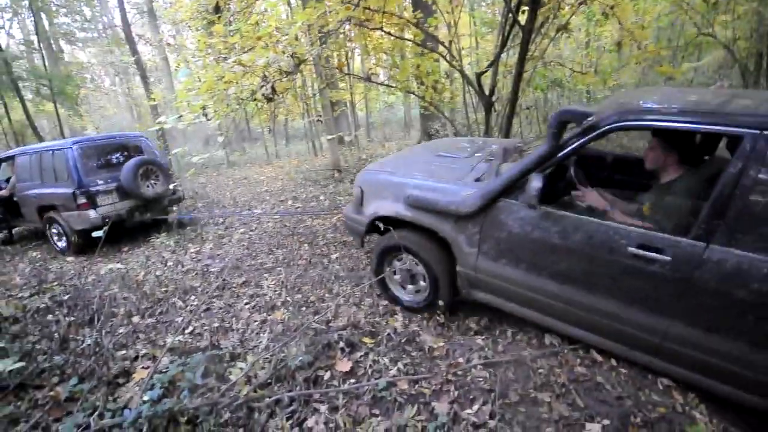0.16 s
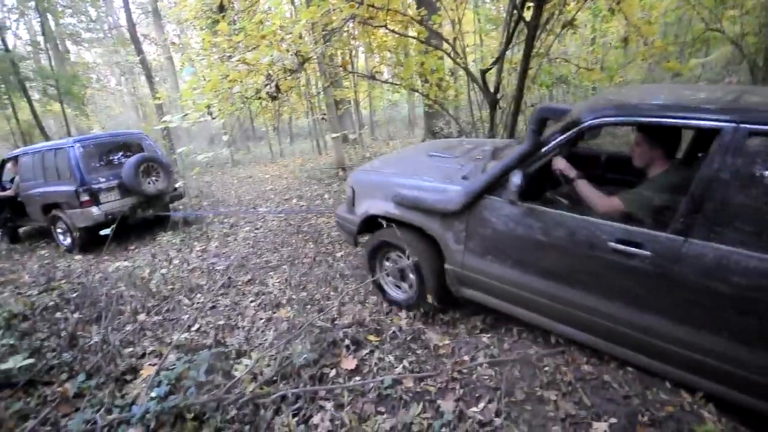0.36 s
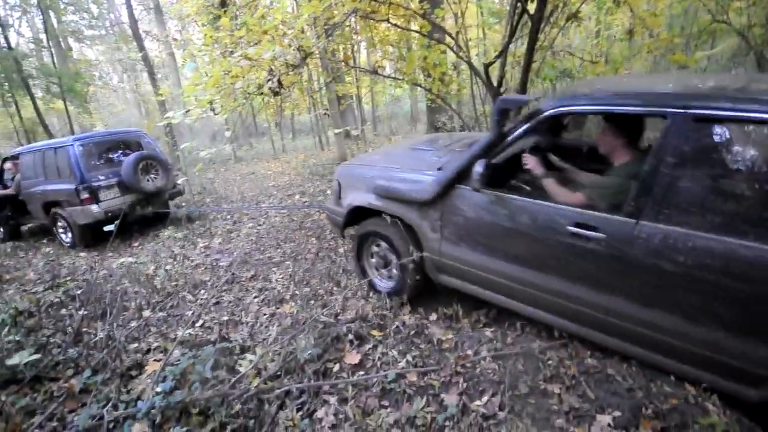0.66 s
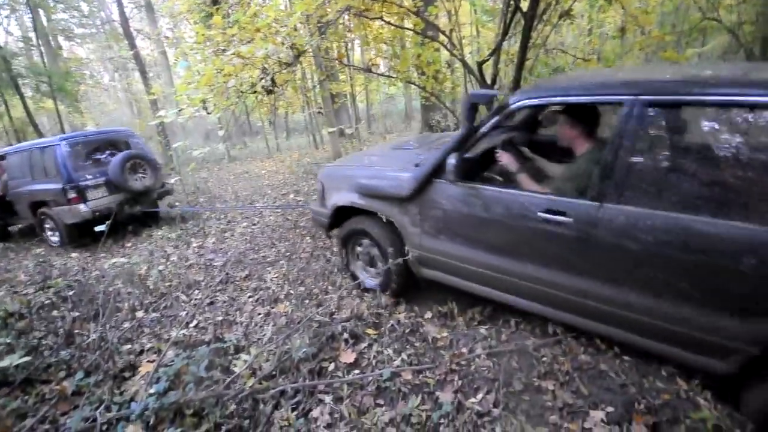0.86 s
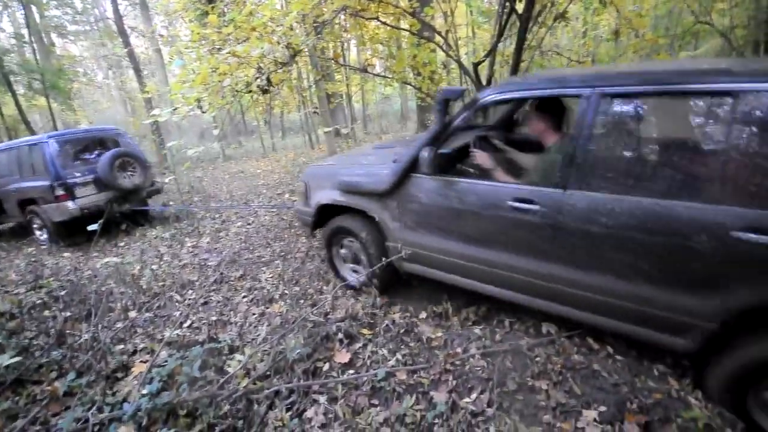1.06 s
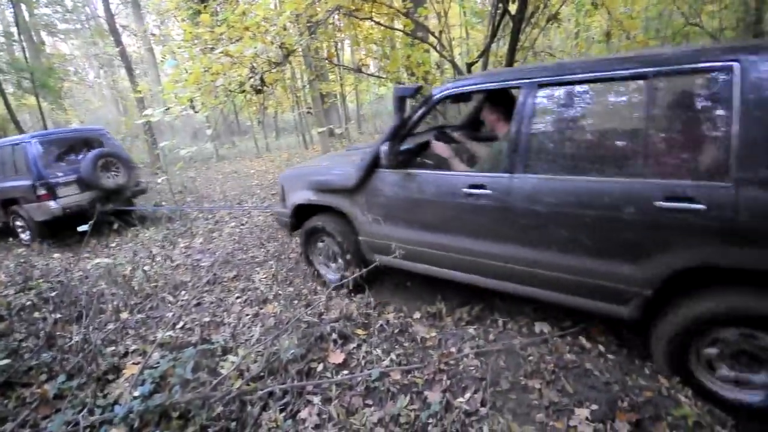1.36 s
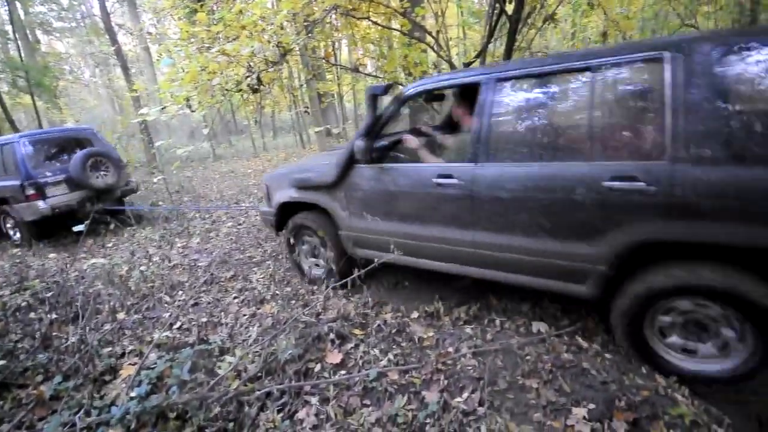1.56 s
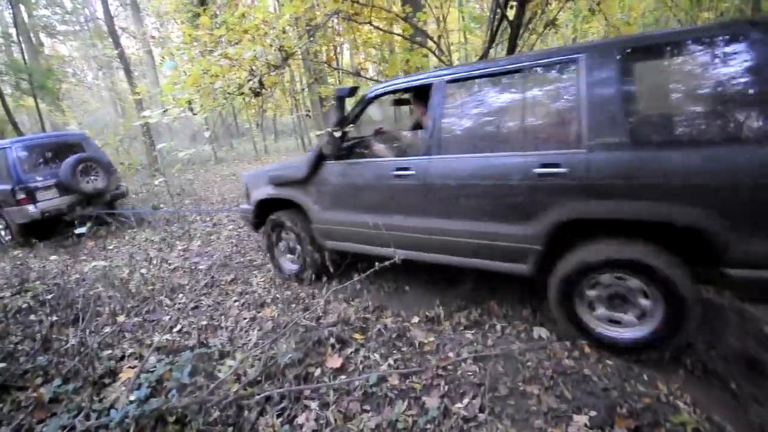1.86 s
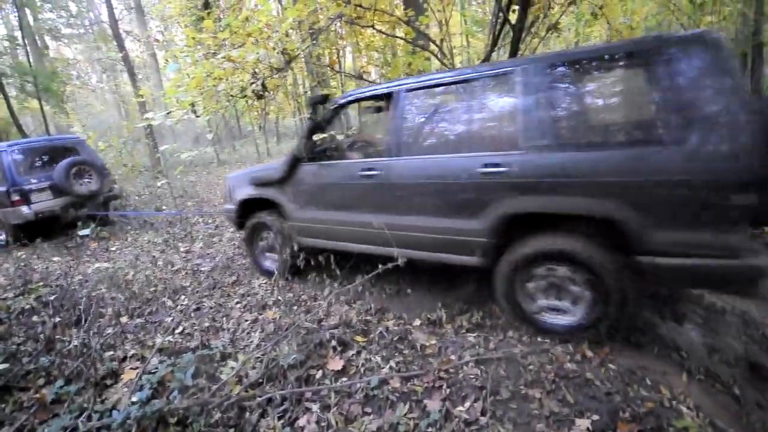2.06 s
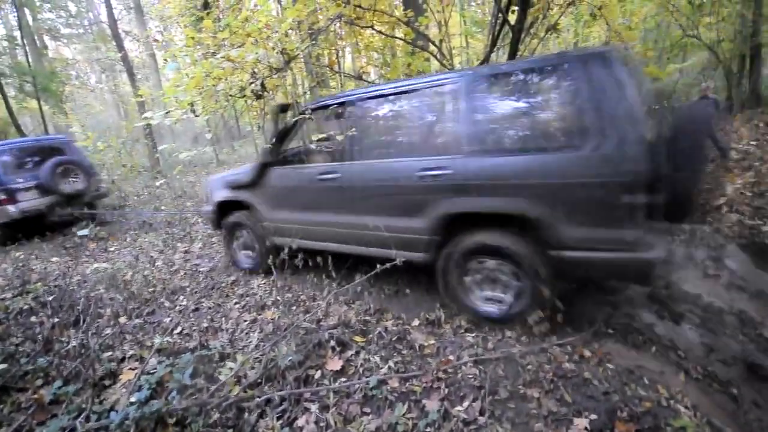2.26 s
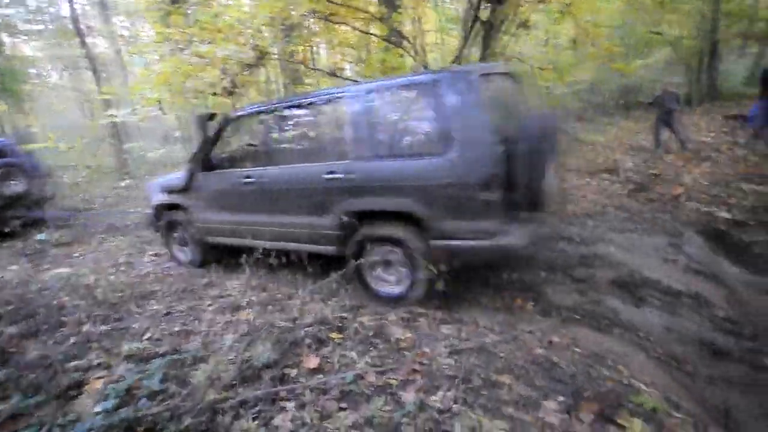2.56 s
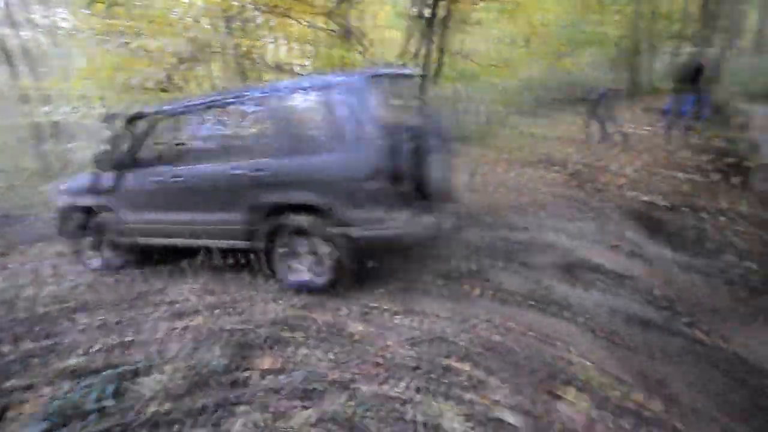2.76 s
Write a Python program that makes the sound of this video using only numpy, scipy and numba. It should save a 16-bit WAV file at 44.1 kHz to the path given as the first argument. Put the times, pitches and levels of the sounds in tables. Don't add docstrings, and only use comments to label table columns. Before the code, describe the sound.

A diesel four-wheel-drive passes close on a muddy forest track. Its knocking, booming growl climbs from 0 to about 1.1 s, with metallic rattle and hollow hoots, then sinks from 1.3 s. A gear whine sounds near 1.9-2.2 s as the throttle lifts; quieter low chugging rolls away. Leaves crackle, twigs snap, mud splashes, and a wheel thuds at 2.9 s. Dull, thin-bass microphone, faint tree echo.

```python
import sys
import numpy as np
from scipy import signal
from scipy.fft import rfft, irfft, next_fast_len
from scipy.io import wavfile
from scipy.ndimage import uniform_filter1d
from numba import njit

SR = 44100
rng = np.random.default_rng(int(sys.argv[2]) if len(sys.argv) > 2 else 0)


def level_to_linear(level):
    exponent = np.asarray(level, float) / 20
    return 10 ** exponent


def master_out(mix):
    frames = np.transpose(np.atleast_2d(mix))
    ceiling = np.clip(frames, -1, 1)
    pcm = np.round(ceiling * 32767).astype(np.int16)
    wavfile.write(sys.argv[1], SR, pcm)


N = 127890


def level(x, db):
    return x * level_to_linear(db) / np.sqrt(np.mean(x ** 2))


def curve(table, axis):
    return np.interp(np.arange(N) / SR, np.array(table)[:, 0], np.array(table)[:, axis])


def spectrum_db(table, hz):
    points = np.array(table)
    return np.interp(np.log(hz), np.log(points[:, 0]), points[:, 1])


def colour(x, table):
    size = next_fast_len(N + 4096)
    hz = np.arange(size // 2 + 1) * SR / size + 1
    return irfft(rfft(x, size) * level_to_linear(spectrum_db(table, hz)), size)[:N]


@njit
def svf(x, hz, width_hz):
    y, band, low = np.empty(len(x)), 0., 0.
    g, k = np.tan(np.pi * hz / SR), width_hz / hz
    for i in range(len(x)):
        v = (band + g * (x[i] - low)) / (1 + g * (g + k))
        band, low, y[i] = 2 * v - band, low + 2 * g * v, k * v
    return y


def ring(x, body):
    out = 0
    for k, (hz, width_hz, db) in enumerate(body):
        mode = svf(x, 1. * hz, 1. * width_hz) / np.sqrt(width_hz)
        out = out + (-1) ** k * level_to_linear(db) * mode
    return out


def walk(rate_hz):
    hold = int(SR / rate_hz)
    steps = np.repeat(rng.standard_normal(N // 50), hold)[:N]
    return 1.3 * uniform_filter1d(uniform_filter1d(steps, hold), hold)


def swell(middle_s, length_s):
    return np.cos(np.pi * np.clip((np.arange(N) / SR - middle_s) / length_s, -.5, .5)) ** 2


# start_s, level_db
WIND = [
    (0, 6),
    (.4, -4),
    (1.3, -8.5),
    (1.75, 3),
    (2.1, 1),
    (2.9, -2.5),
]


def rumble():
    ground = level(svf(rng.standard_normal(N), 35., 40.), -43)
    return ground * level_to_linear(3.7 * walk(4.7) + curve(WIND, axis=1))


# start_s, firing_hz, level_db
AHEAD = [
    (0, 71.23, -16),
    (.18, 72.9, -25),
    (.3, 73.7, -39),
    (2.9, 74.5, -52.5),
]
AHEAD_ORDERS_DB = [-13, -3.5, -3, -12, -13.5]


def ahead():
    turn = 2 * np.pi * np.cumsum(curve(AHEAD, axis=1) * (1 + 0.0076 * walk(7.3))) / SR
    hum = 0
    for k, db in enumerate(AHEAD_ORDERS_DB):
        hum = hum + level_to_linear(db + 0.54 * walk(15)) * np.sin((k + 1) * turn + k)
    return hum * level_to_linear(curve(AHEAD, axis=2))


# start_s, peak_db
TWIGS = [(.2075, -22), (.377, -21), (.4, -21), (.4805, -20), (.5375, -19), (.5575, -20), (.573, -19),
         (.9621, -20), (1.0912, -18), (1.3706, -19), (1.563, -21), (1.6097, -20), (1.6268, -19),
         (1.6488, -18), (1.7483, -24), (1.7638, -23), (1.7905, -17), (1.9811, -24), (2.0486, -26),
         (2.0953, -20), (2.3308, -28), (2.4484, -28), (2.841, -29)]


def twigs(decay_s):
    out, t = np.zeros(N), np.arange(800) / SR
    for start_s, peak_db in TWIGS:
        i = int(start_s * SR)
        burst = np.sign(rng.standard_normal(800))
        out[i:i + 800] += level_to_linear(peak_db) * burst * np.exp(-t / decay_s)
    return level_to_linear(6) * (svf(out, 3600., 2400.) + .6 * svf(out, 1900., 900.))


def leaves(per_s):
    chance = rng.random((2, N))
    struck = chance[0] < per_s * level_to_linear(2.5 * walk(12)) / SR
    size_db = np.minimum(-2.6 * np.log(chance[1]), 11)
    grains = struck * level_to_linear(size_db) * np.sign(rng.standard_normal(N))
    return level(svf(grains, 2000.0, 2500.) + 0.28 * svf(grains, 3500.0, 1300.0), -12.5)


# middle_s, length_s, centre_hz, level_db
SPLASHES = [(0.543, 0.13, 1810, -26), (1.076, 0.13, 3034, -30.5), (1.349, 0.065, 1048, -23),
            (1.618, .06, 3512, -33.5), (1.651, 0.014, 3800, -34), (2, 0.028, 2980, -39),
            (2.262, 0.036, 1300, -34.5), (2.47, 0.033, 4962, -38), (2.594, 0.023, 1459, -33),
            (2.83, 0.048, 4070, -41.5), (.558, .04, 1500, -22), (.73, .04, 900, -21), (1.58, .08, 700, -27),
            (.965, .03, 2800, -31), (1.12, .1, 2100, -29)]


def splashes():
    out = 0
    for middle_s, length_s, hz, db in SPLASHES:
        grit = rng.standard_normal(N) * (rng.random(N) < .05)
        out = out + level(svf(grit, 1. * hz, 0.45 * hz), db) * swell(middle_s, 2 * length_s)
    return out


def thud():
    start_s, pitch_hz, peak_db, t60_s = 2.8897, 230, -11.5, .07
    t = np.maximum(np.arange(N) / SR - start_s, 0)
    return -level_to_linear(peak_db) * np.sin(2 * np.pi * pitch_hz * t) * np.exp(-np.log(1000) * t / t60_s)


# pitch_hz, density_db (dB per Hz)
ROAR = [(45, -44.5), (90, -24.5), (160, 0.5), (352, -0.5), (480, -7), (742, -6), (1530, -9.5),
        (4200, -25.5)]


def roar():
    out, surge = 0, walk(6.36)
    for hz in 60 * 2 ** np.arange(0, 6.9, 1 / 3):
        band = svf(svf(rng.standard_normal(N), hz, hz / 3), hz, hz / 3)
        out = out + level_to_linear(spectrum_db(ROAR, hz) + 0.37 * surge + 0.96 * walk(8.93)) * band
    return level(out, 1.5)


# middle_s, length_s, level_db
BOOMS = [(.1, 0.27, -32), (0.41, 0.4, -20.5), (1.147, .6, -25), (1.04, .8, -34), (.2, 0.62, -37),
         (.55, .25, -25), (0.592, 0.13, -21.5), (1.156, 0.094, -20.5), (1.2, .35, -25), (1.4, 0.16, -24),
         (1.08, 0.24, -23.5), (.3, 0.35, -26), (.82, 0.15, -24.5), (1.42, .15, -27), (.74, .14, -19),
         (.86, .07, -20), (.33, .08, -23), (.32, .07, -22), (1.31, .05, -21), (1.39, .06, -19),
         (1.49, .12, -21), (1.53, .12, -23), (1.585, .09, -19.5), (1.58, .13, -29), (1.66, .1, -24),
         (1.695, .08, -21), (1.755, .07, -22), (1.83, .08, -22), (1.87, .56, -42), (2.2, .1, -31),
         (2.38, .11, -30), (2.74, .32, -31), (2.7, 0.68, -41), (2.75, .3, -40)]
BOOM_ORDERS = [2, 2, 2, 1, 1, 3, 2, 3, 4, 4.25, 4.5, 5, 3.75, 5, 3, 5, 3.75, 6.25, 4, 3.25, 2, 4, 3, 1.5, 5,
               3, 3.5, 4, 1, 7.75, 9, 3, 2, 4]


def booms(firing_hz, rough_db, sway_rad):
    turn, out = 2 * np.pi * np.cumsum(firing_hz) / SR, 0
    for order, (middle_s, length_s, db) in zip(BOOM_ORDERS, BOOMS):
        pitch_hz = order * firing_hz[int(middle_s * SR)]
        loose = min(max(pitch_hz / 75 - 1.9, .2), 3)
        gain = level_to_linear(db - 0.5 + rough_db * loose * walk(22.16)) * swell(middle_s, length_s) ** 0.34
        out = out + gain * np.sin(order * turn + sway_rad * loose * walk(18))
    return out


def hoot(table, width_hz, steady):
    lowpass = signal.butter(2, width_hz, fs=SR, output="sos")
    low = signal.sosfilt(lowpass, rng.standard_normal((2, N)))
    low = low / low.std()
    turn = 2 * np.pi * np.cumsum(curve(table, axis=1)) / SR + .5 * walk(25.07)
    tone = (steady + low[0]) * np.cos(turn) + low[1] * np.sin(turn)
    return level(tone, 0) * level_to_linear(curve(table, axis=2))


# start_s, pitch_hz, level_db
SHIELD = [(0, 725, -11), (.2, 735, -8), (.4, 740, -11), (.6, 750, -11), (.73, 772, -6), (.9, 740, -14),
          (1.3, 740, -12), (1.52, 720, -10), (1.64, 778, -8), (1.78, 745, -6), (1.95, 727, -6),
          (2.05, 705, -10), (2.3, 704, -24)]
# start_s, pitch_hz, level_db
INTAKE = [
    (0, 1410, -29),
    (.7, 1499, -19.5),
    (.95, 1532, -7.5),
    (1.25, 1530, -11.5),
    (1.5, 1560, -26.5),
    (1.8, 1644, -11.5),
    (2.0, 1667, -7.5),
    (2.3, 1480, -13),
    (2.6, 1427, -9.5),
]
# start_s, pitch_hz, level_db
SILENCER = [(0, 330, -20), (.75, 340, -18), (.92, 355, -5), (1.05, 362, -4), (1.18, 358, -4),
            (1.32, 345, -7), (1.48, 310, -9), (1.62, 300, -5), (1.75, 300, -14), (2.0, 300, -24)]


def hoots():
    shield = hoot(SHIELD, width_hz=30, steady=2.0)
    intake = hoot(INTAKE, width_hz=65.0, steady=0.25)
    return shield + intake + hoot(SILENCER, width_hz=54, steady=0.42)


# start_s, level_db
GEAR = [
    (0, -30),
    (1.75, -24),
    (1.88, -9),
    (1.99, -8),
    (2.06, -4),
    (2.11, -6),
    (2.17, -8),
    (2.21, -26),
    (2.9, -30),
]


def gear_whine(firing_hz):
    turn = 2 * np.pi * 24.4 * np.cumsum(firing_hz) / SR
    return level_to_linear(curve(GEAR, axis=1) + 1.5 * walk(25)) * np.sin(turn + .6 * walk(30))


CYLINDERS_DB = [-2, -4, -4, -9]


def firings(firing_hz, scatter_db):
    turns = np.cumsum(firing_hz) / SR
    count = turns.astype(int)
    size_db = np.resize(CYLINDERS_DB, 400) + scatter_db * rng.standard_normal(400)
    size = level_to_linear(size_db)[count]
    pulses = np.diff(count, prepend=0) * size * SR / firing_hz
    return pulses, turns % 1, size


# pitch_hz, width_hz, level_db
EXHAUST = [(80.5, 63, -21.5), (123, 34, -5.5), (166, 31, -8), (239, 49, 3), (303.3, 37, 1), (336, 53, 2.5)]
# pitch_hz, width_hz, level_db
BLOCK = [(641, 88, -1), (733, 73, 0), (877.4, 52, -1.5), (1690, 540, -0.5), (3150, 3800, -3.5),
         (4070, 1200, -22)]


def engine(firing_hz, load_db):
    pulses, phase, size = firings(firing_hz * (1 + .004 * walk(20)), scatter_db=1.0)
    puff = size * np.exp(-phase / 0.6)
    pipe = level(ring(pulses, EXHAUST), -7.5) * level_to_linear(load_db)
    gas = level(ring(puff * rng.standard_normal(N), EXHAUST), -8)
    knock = level(ring(puff * rng.standard_normal(N), BLOCK), -5)
    return pipe + gas + knock + gear_whine(firing_hz) + hoots()


def trunk_echoes(x):
    t60_s, wet_db = 0.94, -10
    t = np.arange(SR // 2) / SR
    trunks = rng.standard_normal(len(t)) * np.exp(-np.log(1000) * t / t60_s) * (t > .015)
    wet = signal.fftconvolve(x, trunks / np.sqrt(np.sum(trunks ** 2)))[:N]
    return level_to_linear(wet_db) * wet


# start_s, firing_hz, closeness_db, exhaust_load_db
DRIVE = [(0, 50.18, -18.5, -12), (.24, 54.66, -19.5, 2.5), (.4, 63.2, -17.5, -3.5), (.62, 72.69, -18, 2),
         (.9, 82.87, -17.5, -0.5), (1.1, 87.26, -18.5, -3.5), (1.29, 84.3, -19, -5),
         (1.4, 79.72, -18.5, -1), (1.5, 75.6, -18, -3), (1.66, 66.19, -20, -3), (1.85, 55.68, -20.5, -12),
         (2.06, 47.23, -24, -12), (2.17, 41.61, -26, -16), (2.35, 35.37, -26.5, -11),
         (2.6, 40.73, -27.5, -6), (2.7, 37.8, -28, -25), (2.8, 34.95, -28, -13), (2.9, 32.7, -27.5, -12)]


def scene():
    firing_hz, close_db, load_db = curve(DRIVE, axis=1), curve(DRIVE, axis=2) - 3, curve(DRIVE, axis=3)
    vehicle = (engine(firing_hz, load_db) + roar()) * level_to_linear(close_db)
    tyres = leaves(per_s=1500) * level_to_linear(-20.5 + 0.67 * (close_db + 22))
    dry = rumble() + ahead() + twigs(decay_s=.0016) + splashes() + thud()
    dry = dry + tyres + booms(firing_hz, rough_db=1.6, sway_rad=.6) + vehicle
    return (dry + trunk_echoes(dry))[None]


def band_limit(x):
    return signal.sosfilt(signal.butter(12, 12750, fs=SR, output="sos"), x)


# pitch_hz, gain_db
MIC = [(2500, -0.5), (4000, 0.5), (4800, -2), (5250, -7.5), (5600, -11), (6200, -36)]
# pitch_hz, gain_db
SMOOTHING = [(5800, 0), (7000, -10.5), (8000, -12.5), (9300, -16), (10000, -11.5), (10600, -9),
             (12500, -17.5)]


def record(dry):
    coarse, end_fade_s = 4, .0015
    x = np.tanh(1.36 * dry[0]) / 1.056
    x = signal.sosfilt(signal.butter(3, 66, "high", fs=SR, output="sos"), x)
    x = colour(x, MIC) * (np.arange(N) % coarse == 0)
    u = np.abs(np.arange(-2 * coarse, 2 * coarse + 1)) / coarse
    inner = 1.5 * u ** 3 - 2.5 * u ** 2 + 1
    outer = -.5 * u ** 3 + 2.5 * u ** 2 - 4 * u + 2
    cubic = np.where(u < 1, inner, outer)
    x = colour(np.convolve(x, cubic, "same"), SMOOTHING)
    x = x * np.minimum((N - np.arange(N)) / SR / end_fade_s, 1)
    return band_limit(x[None])


dry = scene()
out = record(dry)
master_out(out)
```